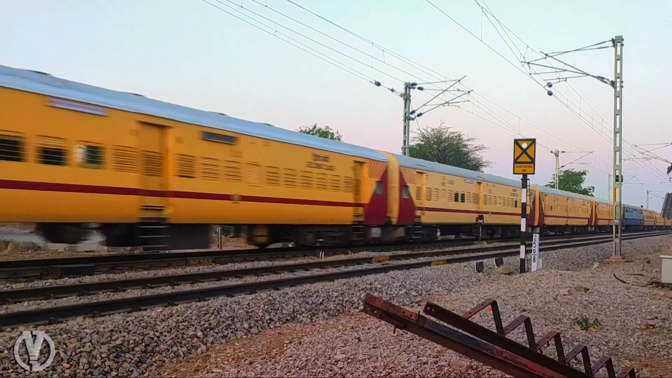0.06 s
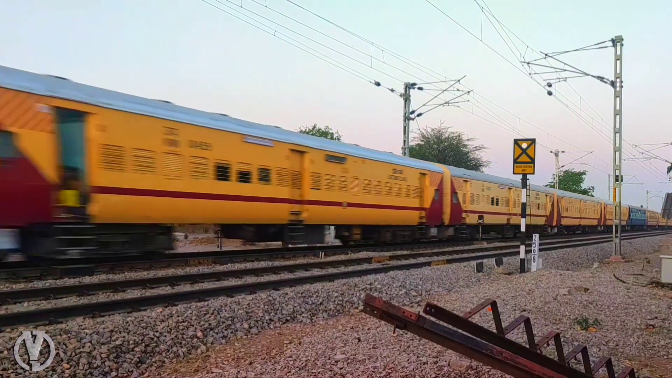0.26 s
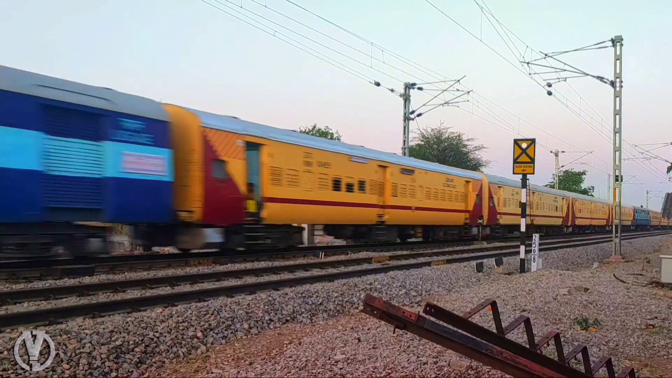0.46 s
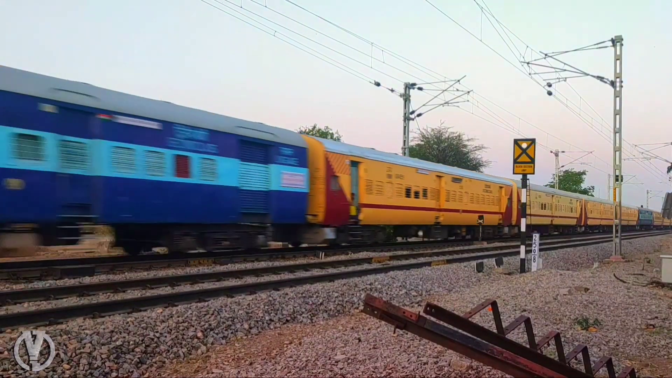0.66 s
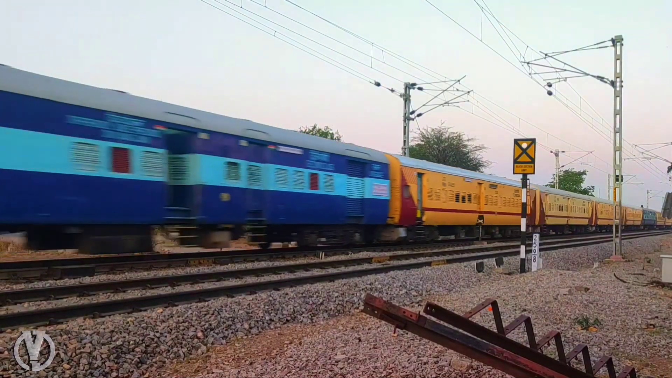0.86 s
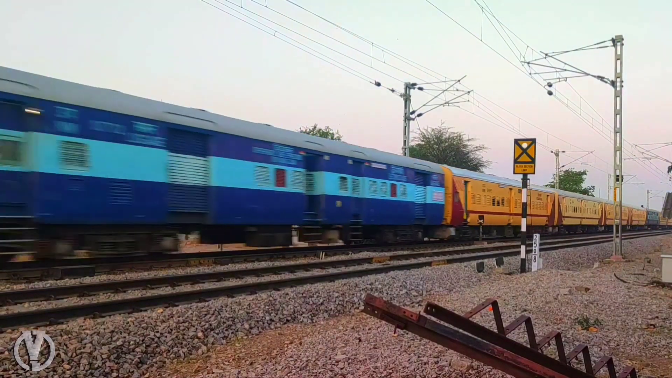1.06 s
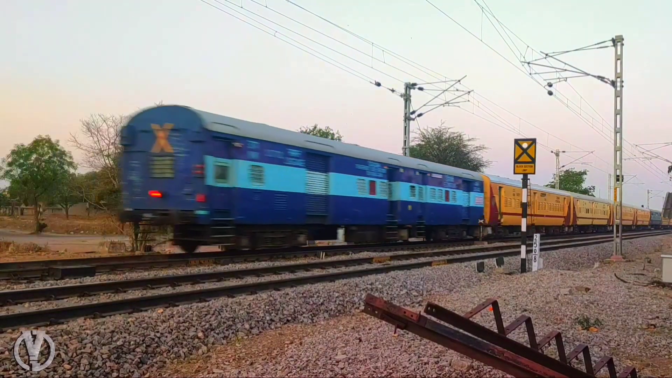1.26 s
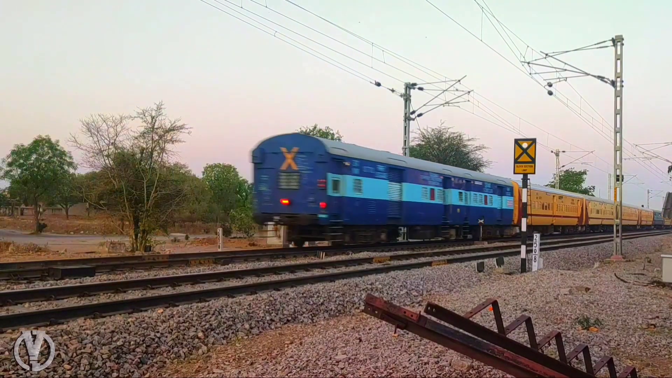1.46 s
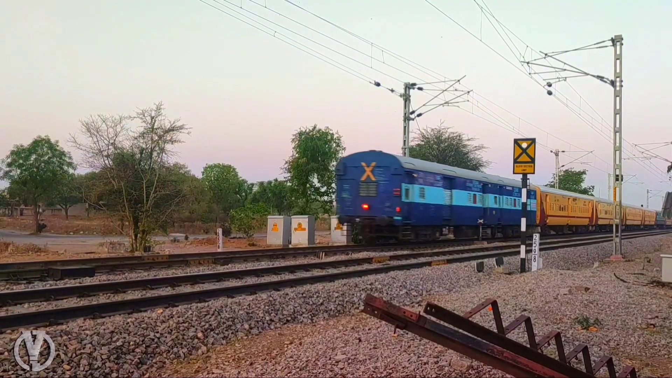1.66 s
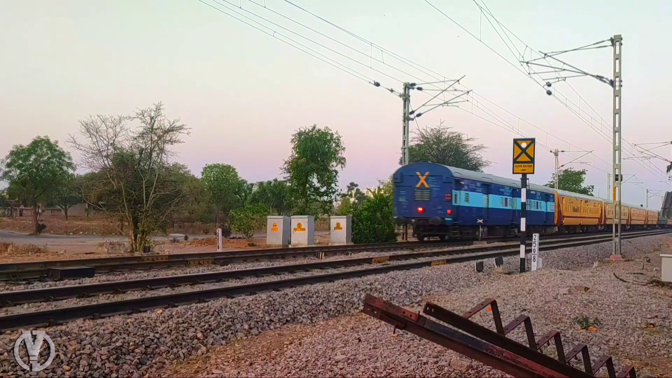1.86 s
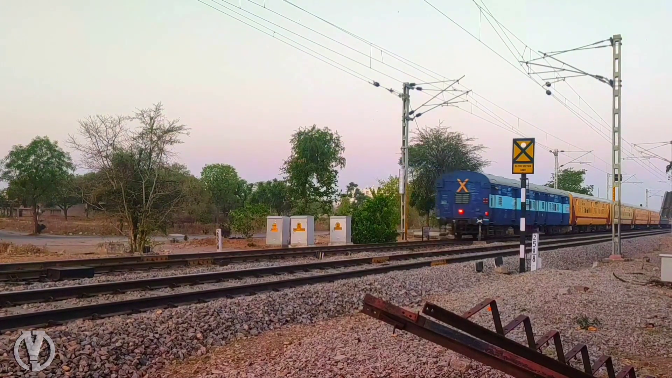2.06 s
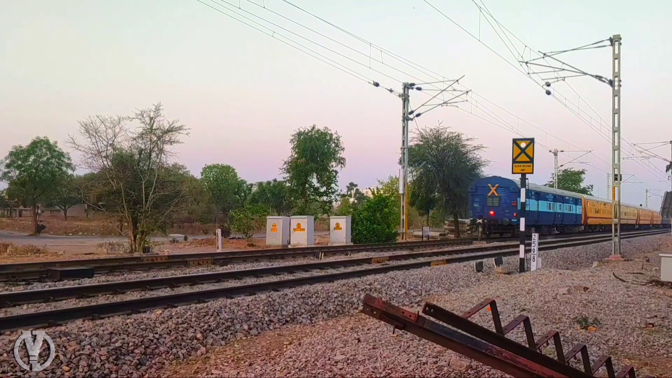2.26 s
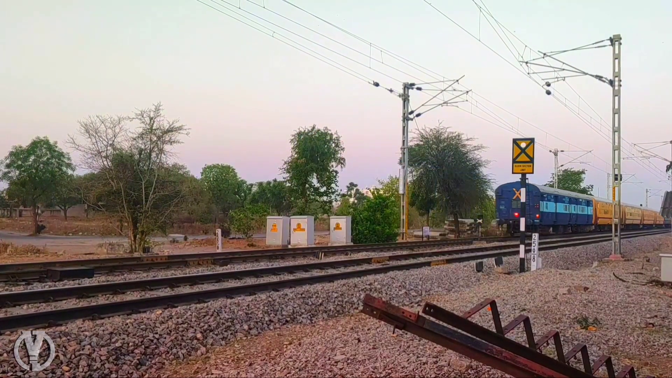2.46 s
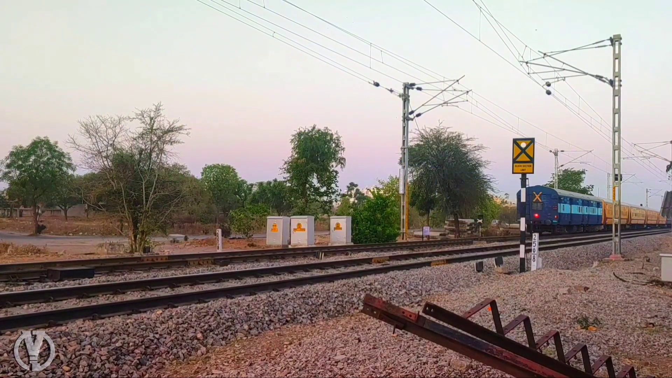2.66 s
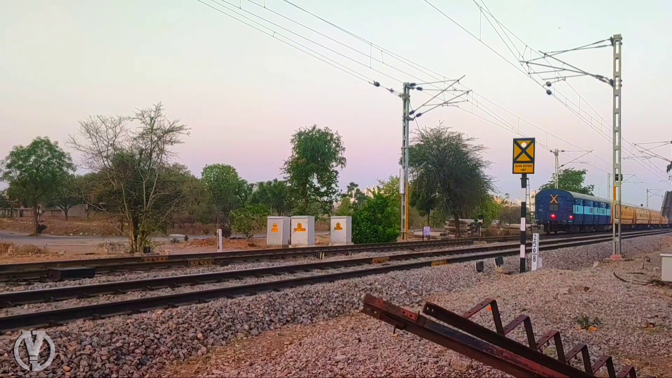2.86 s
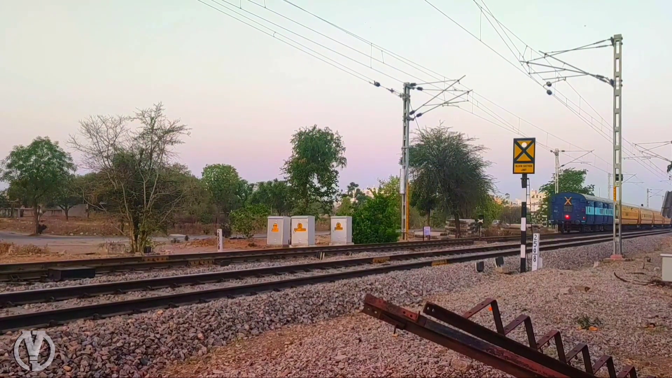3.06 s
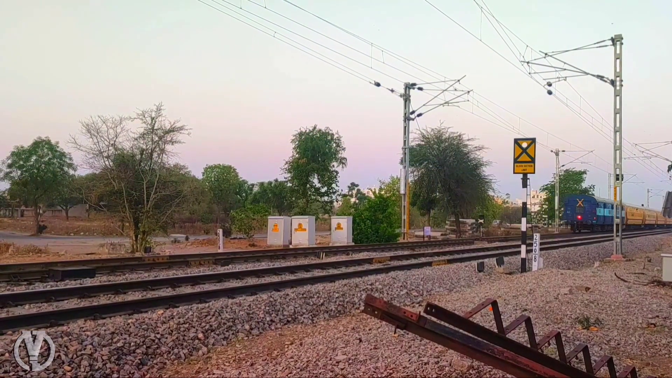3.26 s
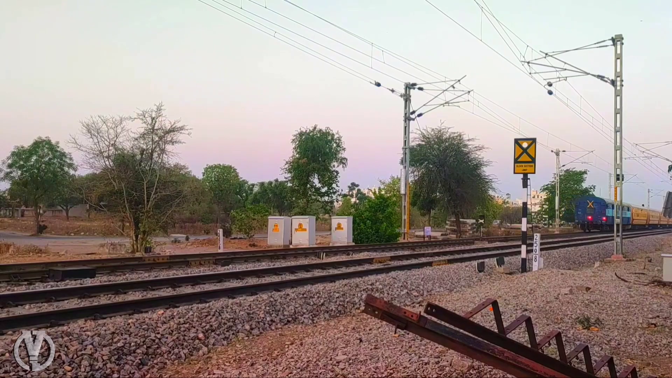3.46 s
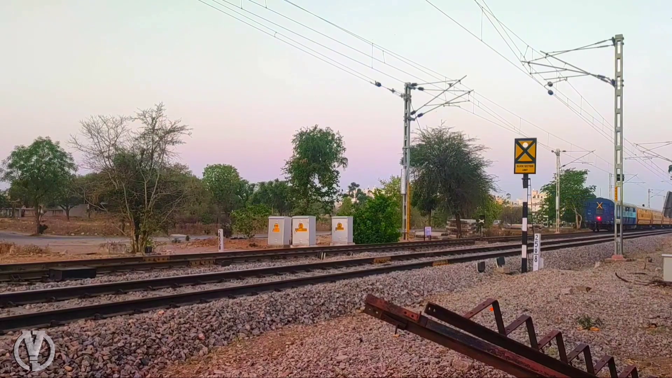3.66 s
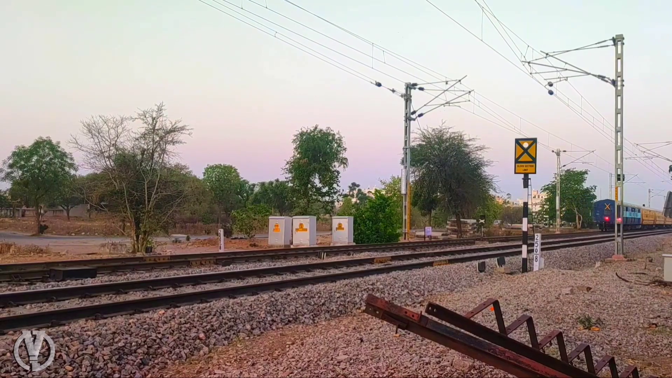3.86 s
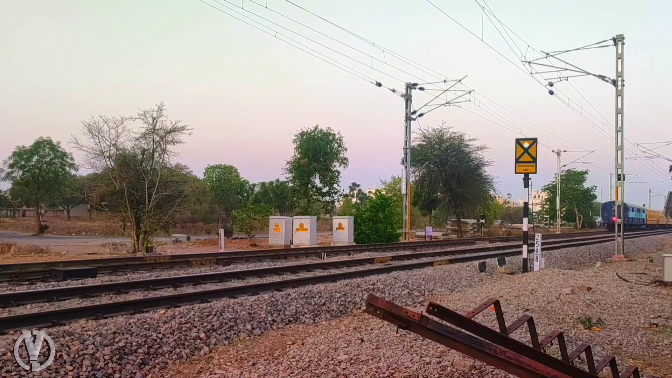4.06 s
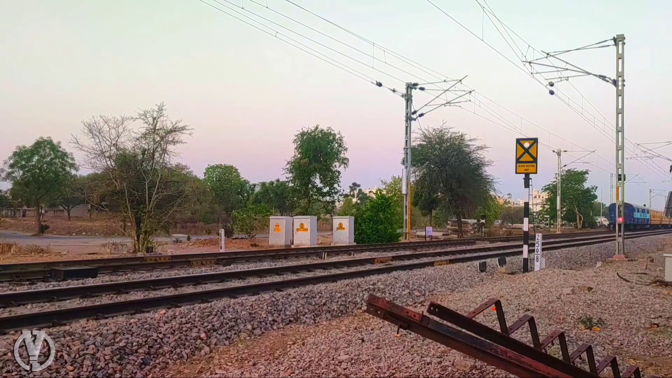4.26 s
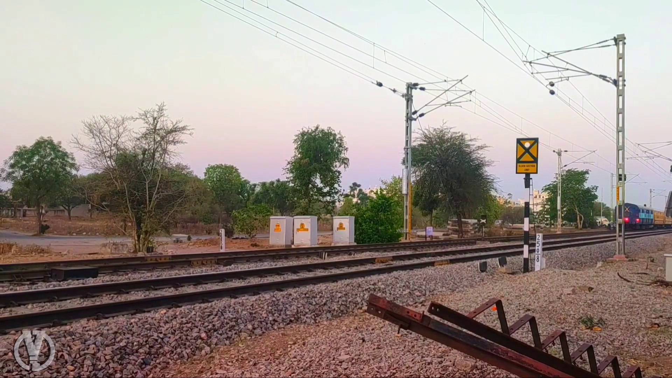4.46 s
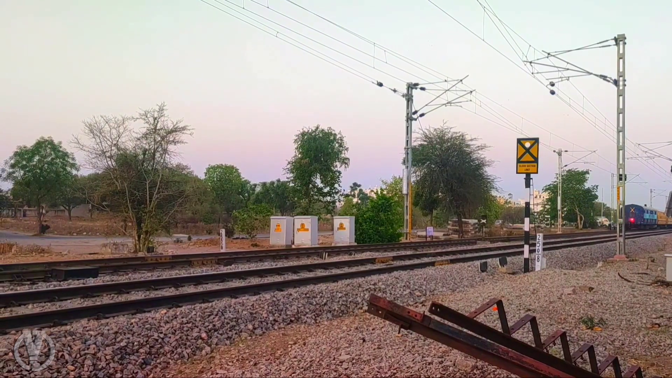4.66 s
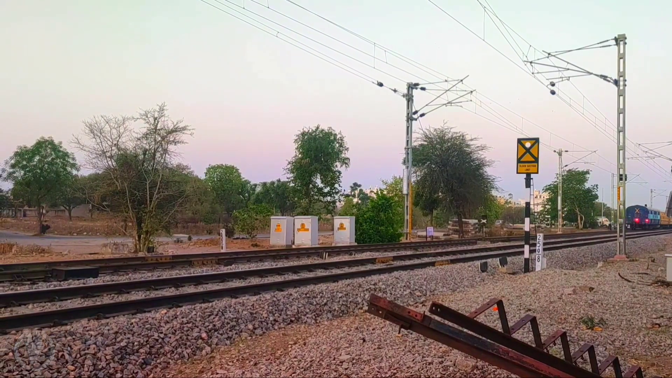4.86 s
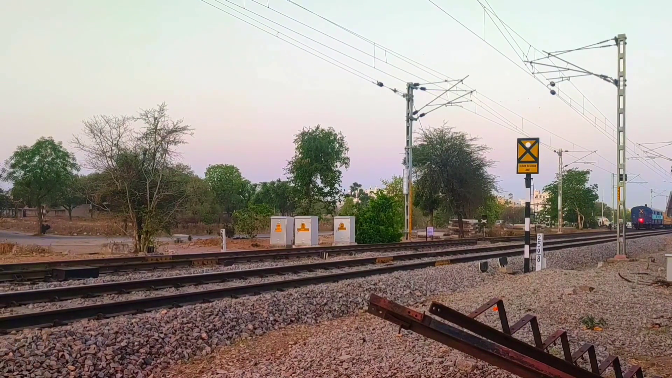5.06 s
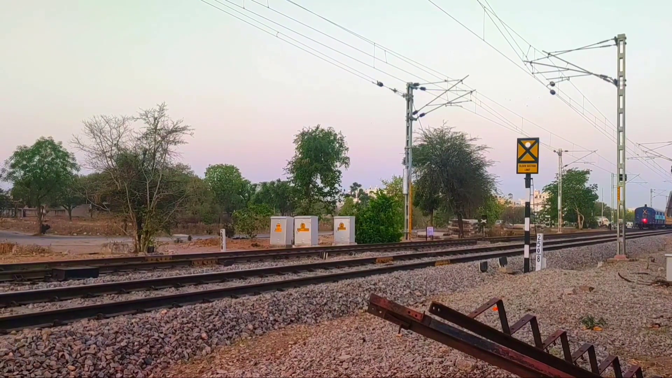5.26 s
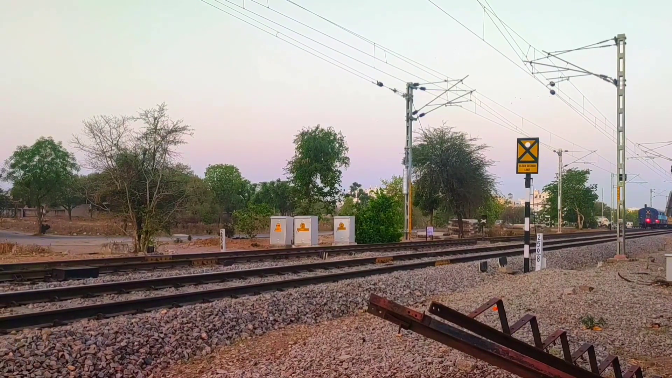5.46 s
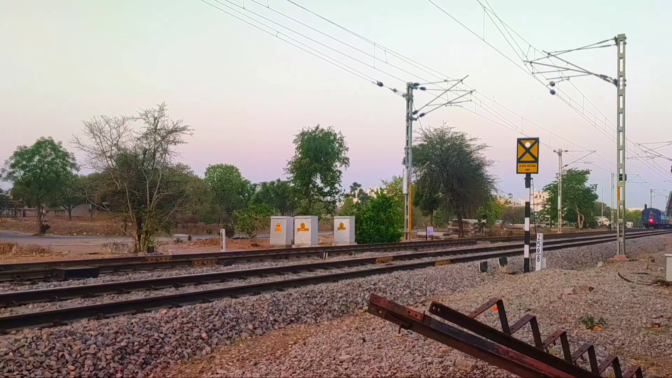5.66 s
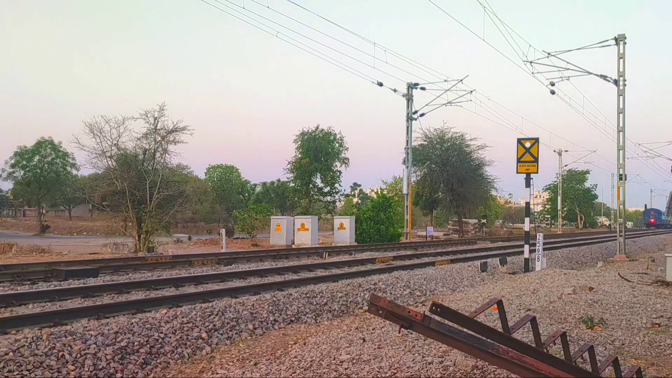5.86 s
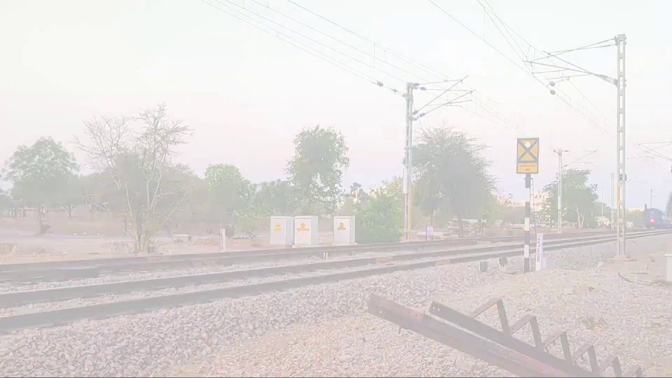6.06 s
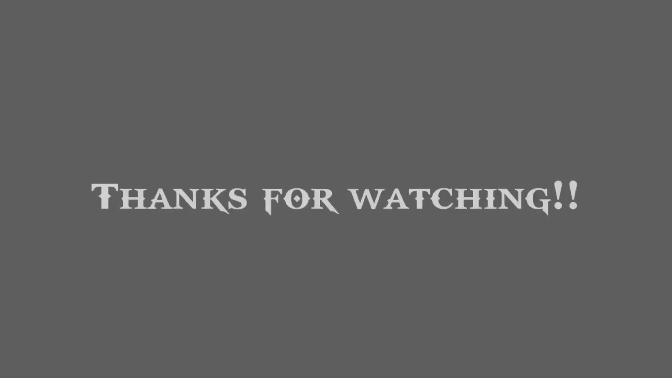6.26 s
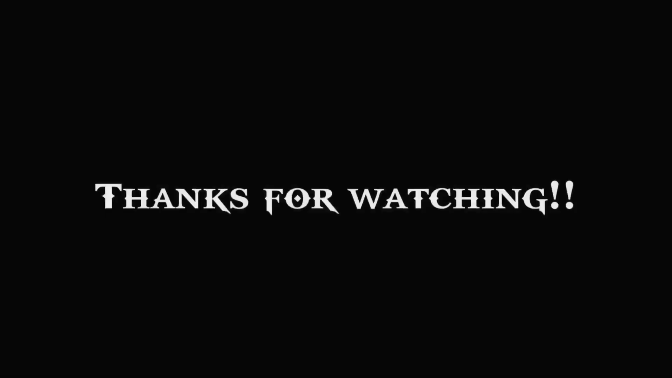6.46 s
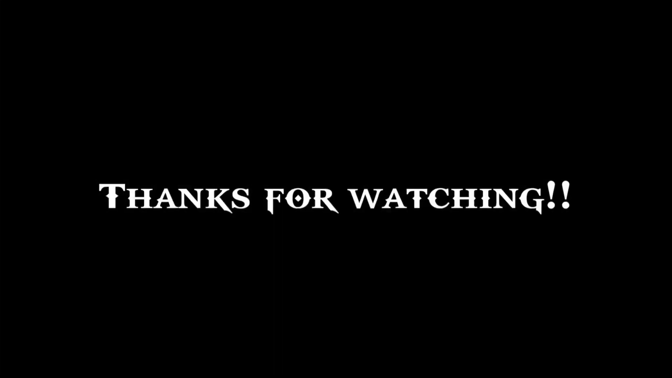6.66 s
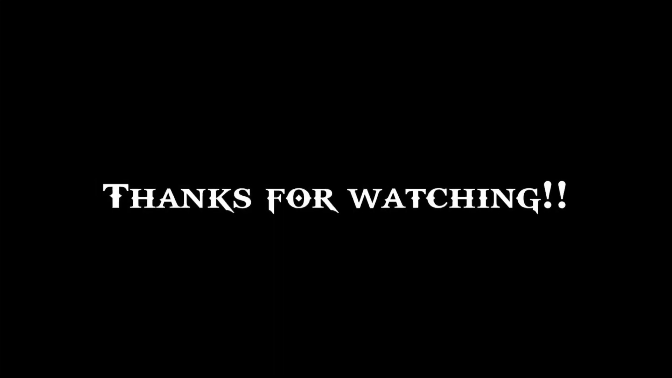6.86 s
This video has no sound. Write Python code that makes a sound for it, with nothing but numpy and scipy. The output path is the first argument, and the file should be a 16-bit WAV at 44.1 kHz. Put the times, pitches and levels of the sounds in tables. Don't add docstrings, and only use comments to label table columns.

```python
import sys
import numpy as np
from scipy import signal
from scipy.fft import rfft, irfft, next_fast_len
from scipy.io import wavfile
from scipy.ndimage import uniform_filter1d, map_coordinates

SR = 44100
rng = np.random.default_rng(int(sys.argv[2]) if len(sys.argv) > 2 else 0)


def nominal_scale(level):
    x = np.asarray(level, float) / 20
    return 10 ** x


def put_to_file(sound):
    columns = np.atleast_2d(sound).T
    safe = np.clip(columns, -1, 1)
    whole_steps = np.round(safe * 32767)
    wavfile.write(sys.argv[1], SR, whole_steps.astype(np.int16))


N = 304277
T = np.arange(N) / SR
SIZE = next_fast_len(N)
HZ = np.maximum(np.fft.rfftfreq(SIZE, 1 / SR), 1)

# low_hz, high_hz
PART_BANDS = [(200, 500), (500, 1300), (1500, 2800), (4000, 10000)]
# time_s, left_port_lag_ms, near_share (0-1)
BEARING = [
    (0, 0.46, 0.91),
    (1.2, .46, 0.69),
    (1.45, 0.31, 0.65),
    (1.75, .08, 0.37),
    (2.5, 0.034, 0.4),
    (2.6, .01, 0.01),
    (6.9, .01, 0),
]
# time_s, level_db
ROLLING_LEVEL = [(0.0, -11), (0.34, -16), (0.74, -15), (0.88, -17.5), (1.03, -17.5), (1.19, -18),
                 (1.36, -20), (1.47, -21), (1.53, -23.5), (1.89, -24), (2.08, -25), (2.38, -23.5),
                 (2.53, -25), (2.7, -28), (3.1, -27.5), (3.95, -28.5), (5.1, -28.5), (6.2, -30)]
# frequency_hz, density_db (per Hz)
NEAR_COLOUR = [(71, -31), (120, 9.5), (184, -9), (299, 5), (413, 1), (476, -2), (632, -3), (987, -5),
               (1230, -13), (2000, -10.5), (2510, -15.5), (2950, -15), (3330, -18), (9730, -23.5),
               (15200, -35.5)]
FAR_COLOUR = [(71, -32.5), (120, -9), (187, -14), (397, -12), (619, -2), (874, -1), (1050, 1), (1210, -3.5),
              (2200, -6.5), (2730, -19.5), (4160, -17.5), (5870, -25.5), (10600, -33), (13500, -50.5),
              (15200, -103)]
# frequency_hz, width_hz, lift_db
NEAR_MODES = [(300, 170, 1.5), (427, 19, 4), (594, 60, 3), (2010, 140, 5), (2500, 140, 7.5),
              (3400, 180, 3.5), (3860, 140, 5.5), (14600, 1300, 4)]
FAR_MODES = [(685, 180, 2.4), (1020, 110, 4), (2090, 20, 2.8), (2370, 34, 2.4), (3160, 130, 4),
             (3500, 220, 5), (3830, 220, 4), (4220, 180, 4.4), (5050, 50, 1.8), (5140, 46, 3)]
# frequency_hz, share (0-1 once clipped)
NEAR_ALIKE = [(150, 5), (300, 1), (700, 0.1), (1400, 1), (3000, -0.08), (6000, -1.1), (12000, -0.45)]
FAR_ALIKE = [(120, 1), (300, 0.96), (700, 0.79), (1400, 0.26), (3000, 0.21), (6000, 0.19), (12000, .05)]
# frequency_hz, left_minus_right_db
NEAR_BALANCE = [(60, -1), (110, 0), (200, 2.3), (380, 1), (690, -1.5), (1280, 3), (2350, 4.5), (4340, 0.5),
                (8000, 2), (14800, -2.5)]
FAR_BALANCE = [(60, -2), (110, -0.5), (200, 1), (380, -2), (690, 1), (1280, -4.5), (2350, 2.5), (4340, -2),
               (8000, 5.5), (14800, -15)]
# over_rolling_db, drift_db_per_s
NEAR_PARTS = [
    (-1.5, -2.5),
    (1.5, 1.5),
    (-2, -1.9),
    (-5.5, 0),
]
FAR_PARTS = [
    (-11, 3),
    (-1.05, -.3),
    (0, 0.38),
    (-6, -2),
]
# start_s, length_s, pitch_hz, level_db
TRACK_TONES = [(0.0, 0.051, 1940, -10), (0.058, 0.1, 7120, -10.5), (0.27, 0.05, 1860, -9),
               (0.28, 0.06, 3500, -20), (0.54, 0.037, 2700, -13.5), (0.631, 0.06, 2570, -19.5),
               (0.679, 0.061, 2525, -7.5), (0.692, 0.084, 1706, -15), (0.9, 0.04, 2500, -19.5),
               (1.073, 0.11, 2430, -16.5), (1.11, 0.07, 3230, -24), (1.18, 0.044, 3860, -25.5),
               (1.21, 0.11, 2563, -17), (1.323, 0.054, 2400, -19), (1.341, 0.18, 4650, -23.5),
               (1.346, 0.091, 8370, -22), (1.39, 0.045, 6380, -22.5), (1.447, 0.053, 1966, -16),
               (1.65, 0.04, 1550, -16), (1.65, 0.06, 3830, -24.5), (1.67, 0.03, 2090, -17),
               (1.827, 0.059, 2050, -17.5), (1.882, 0.05, 7240, -20.5), (2.152, 0.1, 3790, -28.5),
               (2.479, 0.031, 2070, -17.5), (2.672, 0.05, 2380, -26), (2.999, 0.038, 2080, -17.5),
               (3.039, 0.21, 4190, -26), (5.27, 0.22, 3855, -32.5), (5.86, 0.069, 2090, -25),
               (.07, 0.063, 7900, -16), (.88, 0.49, 2455, -25), (0.983, 0.31, 2525, -23.5),
             (1.1, 0.15, 2020, -19), (1.08, .1, 671, -16.5), (2.9, 0.17, 1550, -25),
             (1.24, 0.31, 2500, -24), (.42, .2, 2560, -19), (2.215, 0.12, 1045, -19.5),
             (2.937, 0.042, 965, -18.5), (3.0, 0.41, 1040, -24.5), (2.7, .2, 1030, -28),
             (3.4, 0.17, 1077, -35), (3.94, .07, 1081, -25), (4.98, 0.46, 192, -30),
             (5.365, 0.093, 1022, -27), (5.379, 0.303, 600, -30.5), (5.543, 0.23, 331.5, -30.5),
               (.26, .12, 3400, -21), (.3, .1, 2900, -22), (.69, .06, 1680, -17), (1.0, 0.22, 1050, -22),
                  (.47, .08, 1900, -16), (.63, 0.069, 2000, -15), (.72, .12, 1980, -15),
                  (0.84, .08, 2420, -19), (.88, .1, 1950, -19.5), (.52, .07, 3800, -21.5),
                  (1.28, 0.086, 2480, -20), (4.4, .3, 4700, -36), (4.47, .1, 3500, -33),
                  (5.0, .25, 4800, -38), (5.22, .18, 3200, -36), (5.5, 0.18, 3750, -40),
                  (5.7, .22, 4100, -37), (5.72, .14, 3500, -37), (5.74, .14, 2550, -32),
                  (3.7, .4, 3850, -32), (2.95, 0.37, 1000, -29), (5.38, .5, 195, -35.5),
                  (2.95, .12, 1750, -25.5)]
# time_s, level_db
WAKE_LEVEL = [
    (0, -17.5),
    (.8, -18.5),
    (1.2, -22.5),
    (2.5, -20.5),
    (2.85, -22.5),
    (4.55, -20.5),
    (5.3, -20),
    (5.75, -22.5),
]
# time_s, change_db
BUFFET_SWINGS = [(0.0, 8), (.15, -10), (.23, 8), (.89, 3), (.99, -9), (1.06, 3), (1.33, 2), (1.39, -15.5),
                 (1.44, 3), (1.5, -7.5), (1.56, 4), (1.94, 6.5), (1.99, -7), (2.06, 5), (2.1, -11), (2.15, 3),
                 (2.29, -8), (2.4, -3), (2.46, 7), (5.11, 2.5), (5.17, -20), (5.25, 3.5)]
# frequency_hz, density_db (per Hz)
BUFFET_COLOUR = [(7.1, -33), (14, -4), (30, -6.5), (44, -2.5), (60, -4.5), (84, -8), (110, -18.5),
                 (200, -22), (260, -52.5), (440, -120)]
# start_s, peak_db, pitch_hz
BALLAST_THUMPS = [(0.019, -9, 61.6), (0.084, -6, 95.7), (0.255, -11, 72.8), (0.459, -9, 126),
                  (0.564, -8.5, 94.2), (0.617, -15, 75.1), (0.775, -7.5, 72.7), (0.883, -12, 105),
                  (1.219, -20, 61.9), (1.309, -10.5, 114.8), (1.538, -27, 63), (1.929, -20, 62.3),
                  (2.429, -25, 61.9)]
# time_s, thud_db, clank_db, rattle_db, rise_s
JOINTS = [(0.097, -3.5, -25, -16, .016), (0.291, -17.5, -15.5, -14, 0.019),
          (0.351, -11.5, -5.5, -15, 0.016), (0.439, -15.5, -11, -23.5, .05),
          (0.528, -10.5, -16.5, -26, 0.021), (0.629, -8.5, -14, -28, 0.0078),
          (0.642, -16, -12, -27.5, 0.031), (0.689, -22, -7.5, -16.5, .047), (0.788, -5, -5, -15, .035),
          (0.887, -6, -16, -30.5, 0.019), (1.21, -11.5, -5.5, -38, 0.02), (1.314, -6.5, -8.5, -30, 0.015),
          (1.424, -6.5, -11, -22.5, 0.014), (1.45, -17, -23, -19, 0.041), (1.544, -17.5, -11, -22, 0.04),
          (1.657, -34.5, -15.5, -19.5, 0.027), (1.828, -24, -23, -17.5, .025),
          (1.918, -22.5, -11.5, -17.5, 0.031), (2.157, -34.5, -23, -24, 0.015),
          (2.275, -30.5, -28, -21.5, 0.03), (2.349, -19.5, -12.5, -16.5, 0.034),
          (2.404, -23.5, -20, -26, 0.028), (2.45, -22, -15, -16.5, 0.023), (2.67, -24.5, -24, -31, 0.018)]
# pitch_hz, level_db, t60_s
SLEEPER_MODES = [(170, -5.5, 0.16), (282.6, 5, 0.1), (414.5, 5.5, 0.1), (552, -2, .1), (647, 3.5, 0.078)]
# frequency_hz, density_db
CLANK_COLOUR = [(400, -20.5), (700, 4.5), (1050, -0.5), (1400, 0.5), (2100, -1.5), (3500, -16.5), (5000, -42)]
RATTLE_COLOUR = [(2000, -11.5), (3500, 1.5), (7000, -3), (11000, -7.0), (15300, -9.5)]
GRIND_COLOUR = [(120, -26.0), (230, 1.5), (450, 2), (700, -3), (1100, -27)]
# start_s, peak_db, pitch_hz
KNOCKS = [(0.102, -3, 301), (0.285, -7, 347), (0.343, -8, 336), (0.445, -7, 398), (0.63, -2, 630),
          (0.711, -6, 345), (0.795, -4, 307), (0.896, -4, 296), (1.018, -10, 258), (1.097, -10.5, 326),
          (1.216, -7, 347), (1.319, -5, 291), (1.423, -1.5, 406), (1.544, -12, 283)]
# time_s, peak_db, pitch_hz
VORTICES = [(1.57, -19, 45.3), (1.75, -22, 42), (2.17, -17, 42), (2.54, -15, 38), (2.62, -19, 42),
            (3.12, -20, 58), (3.3, -19, 61.7), (3.49, -18, 58), (3.73, -17.5, 50), (3.97, -18, 42),
            (4.1, -20.5, 70), (4.29, -16.5, 62), (4.38, -14, 50), (4.53, -18, 45), (4.72, -24, 54.6),
            (4.861, -18, 55), (4.97, -15, 50), (5.11, -18, 55), (5.31, -16, 72.4), (5.48, -14.5, 22),
            (5.58, -16, 23), (5.85, -14, 45)]
# pitch_hz, level_db
FAR_WHEEL_MODES = [(2090, -35), (2400, -39), (3500, -41), (3830, -41), (4200, -40), (5100, -48)]
# start_s, length_s, start_hz, end_hz, level_db
CHIRPS = [(4.644, .04, 6000, 5600, -38), (4.4, .025, 5550, 5600, -38), (5.41, .04, 6950, 6900, -40),
          (4.793, .025, 5750, 5900, -39), (4.825, 0.022, 4500, 5360, -38), (4.83, .03, 5500, 6100, -30),
          (5.668, .025, 5200, 4680, -32), (5.69, .03, 5870, 5860, -36), (5.96, 0.052, 5930, 5800, -37),
          (5.69, .025, 5200, 5500, -38), (5.69, 0.02, 4900, 5000, -39), (5.715, 0.022, 4300, 3900, -39),
          (5.73, .015, 4500, 5200, -39)]
# frequency_hz, share (0-1)
TREBLE_KEPT = [(11200, 1), (12200, .45), (13500, .3), (15300, .24)]
# start_s, end_s
FADE = (5.785, 6.223)


def curves(rows):
    s, *columns = np.transpose(rows)
    return [np.interp(T, s, column) for column in columns]


def along_hz(rows):
    hz, value = np.transpose(rows)
    return np.interp(np.log(HZ), np.log(hz), value)


def shape(x, gain):
    return irfft(rfft(x, SIZE) * gain, SIZE)[..., :N]


def rms(x):
    return np.sqrt(np.mean(x ** 2))


def walk(rate_hz):
    hold = int(SR / rate_hz)
    steps = np.repeat(rng.standard_normal(N // hold + 1), hold)
    return uniform_filter1d(uniform_filter1d(steps, hold), hold)[:N]


def swell(t, rise_s):
    u = t / np.clip(rise_s, 0.004, 0.05)
    return (u * np.exp(1 - u)) ** 2


def ports(x, lag_ms):
    late = map_coordinates(x, [np.arange(N) - lag_ms * SR / 1000], order=3, mode="nearest")
    return np.array([late, x])


def roughness(colour, modes, alike, balance, lag_ms):
    lift_db = sum(db / (1 + (2 * (HZ - hz) / width) ** 2) for hz, width, db in modes)
    like = np.clip(along_hz(alike), 0, 1)
    left = 0.26
    right_side, left_side = (ports(rng.standard_normal(N), lag_ms) for _ in range(2))
    both_sides = np.sqrt(1 - left) * right_side + np.sqrt(left) * left_side[::-1]
    common = shape(both_sides, np.sqrt(like))
    apart = shape(rng.standard_normal((2, N)), np.sqrt(1 - like))
    tilt_db = along_hz(balance) / 2 * np.array([[1], [-1]])
    return shape(common + apart, nominal_scale(along_hz(colour) + lift_db + tilt_db))


def rolling(lag_ms, near):
    centres = np.log(np.sqrt(np.prod(PART_BANDS, axis=1)))
    since_gone = np.clip(T - 2.92, 0, 2.76)
    near_nature = (NEAR_COLOUR, NEAR_MODES, NEAR_ALIKE, NEAR_BALANCE)
    far_nature = (FAR_COLOUR, FAR_MODES, FAR_ALIKE, FAR_BALANCE)
    layers = []
    for nature, weight, parts, since in ((near_nature, near, NEAR_PARTS, T),
                                         (far_nature, 1 - near, FAR_PARTS, since_gone)):
        sound = rfft(roughness(*nature, lag_ms), SIZE)
        power = np.abs(sound.mean(axis=0)) ** 2
        band_power = [power[(HZ > lo) & (HZ < hi)].sum() for lo, hi in PART_BANDS]
        own_db = 10 * np.log10(2 * np.array(band_power) / SIZE / N)
        over_db, drift_db = np.transpose(parts)
        layers.append((sound, over_db - own_db, drift_db, since, np.sqrt(weight)))

    level_db = curves(ROLLING_LEVEL)[0]
    shared = walk(11)
    out = 0
    for hz in 125 * 2 ** (np.arange(15) / 2):
        window = np.clip(1 - 2 * np.abs(np.log2(HZ / hz)), 0, 1)
        place = np.interp(np.log(hz), centres, np.arange(len(centres)))
        mix = np.clip(1 - np.abs(place - np.arange(len(centres))), 0, 1)
        band = 0
        for sound, over_db, drift_db, since, weight in layers:
            gain = weight * nominal_scale(mix @ over_db + mix @ drift_db * since)
            band = band + irfft(sound * window, SIZE)[:, :N] * gain
        flicker_db = (0.5 + near) * (0.6 * shared + 1.2 * walk(14))
        out = out + band * nominal_scale(level_db + flicker_db)
    return out


def rings(notes, unrest=0.013, neighbour=0.6):
    out = np.zeros((2, N))
    waver_db = np.array([[3.8, 2.2], [2.2, 3.8]]) @ [walk(130), walk(130)]
    drift = unrest * walk(90)
    for s, length, hz, end_hz, db in notes:
        at = slice(int(max(s, 0) * SR), int((s + length) * SR))
        u = np.linspace(0, 1, at.stop - at.start)
        pitch = (hz + (end_hz - hz) * u) * (1 + drift[at])
        phase = 2 * np.pi * np.cumsum(pitch) / SR
        beside = 2 * np.pi * np.cumsum(hz * (1.03 + drift[::-1][at])) / SR
        skew = np.array([[0], [min(hz / 1900.0, 1.4)]])
        second = neighbour * (400 < hz < 3000) * np.sin(beside - skew)
        envelope = nominal_scale(db - 4 + waver_db[:, at]) * np.sin(np.pi * u) ** 0.6
        out[:, at] += envelope * (np.sin(phase + skew) + second)
    return out


def wheel_and_rail_tones():
    tones = TRACK_TONES
    return rings([(s, length, hz, hz, db) for s, length, hz, db in tones])


def buffet():
    mid, side = shape(rng.standard_normal((2, N)), nominal_scale(along_hz(BUFFET_COLOUR)))
    swing_s = 0.023
    swing_db = sum(db * np.exp(-((T - s) / swing_s) ** 2) for s, db in BUFFET_SWINGS)
    gust = nominal_scale(curves(WAKE_LEVEL)[0] + swing_db + 0.83 * walk(12)) / rms(mid)
    balance = nominal_scale(np.array([[0.4], [-0.4]]))
    return gust * (mid * balance + nominal_scale(-18.0) * side * np.array([[1], [-1]]))


def ballast(lag_ms):
    out = np.zeros(N)
    t = np.arange(SR // 8) / SR
    for s, db, hz in BALLAST_THUMPS:
        at = int(s * SR)
        wave = np.sin(2 * np.pi * hz * t * (0.98 + 3.7 * t))
        out[at:at + len(t)] += nominal_scale(db - 4.0) * swell(t, 0.016) * wave
    return ports(out, lag_ms)


def joints(lag_ms, near):
    t = np.arange(SR // 5) / SR
    thud, clank_env, rattle_env = np.zeros((3, N))
    chance = rng.uniform(-1.08, 1, (len(JOINTS), len(SLEEPER_MODES), 3))
    for (s, thud_db, clank_db, rattle_db, rise_s), draw in zip(JOINTS, chance):
        at = slice(int(s * SR), int(s * SR) + len(t))
        ring = 0
        for (hz, db, t60), (x, y, z) in zip(SLEEPER_MODES, draw):
            decay = nominal_scale(db + 4.0 * z - 60 * t / t60)
            ring = ring + decay * np.sin(2 * np.pi * hz * (1 + 0.077 * y) * t + np.pi * x)
        thud[at] += nominal_scale(thud_db - 7.0) * ring * (1 - np.exp(-t / 0.0043))
        clank_env[at] += nominal_scale(clank_db - 3.5) * swell(t, 0.6 * rise_s)
        early = slice(at.start - SR // 100, at.stop - SR // 100)
        rattle_env[early] += nominal_scale(rattle_db - 2.0) * swell(t, 1.35 * rise_s)
    clank = shape(rng.standard_normal(N), nominal_scale(along_hz(CLANK_COLOUR)))
    rattle = shape(rng.standard_normal((2, N)), nominal_scale(along_hz(RATTLE_COLOUR)))
    dulled = np.where(near > 0, rattle, shape(rattle, HZ < 12500))
    return ports(thud + clank_env * clank / rms(clank), lag_ms) + rattle_env * dulled / rms(rattle)


def stones(lag_ms):
    load, length_s = 0, 0.052
    for s, thud_db, *_ in JOINTS:
        load = load + nominal_scale(thud_db - 8.5) * np.exp(-(2 * (T - s) / length_s - 1) ** 4)
    grind = shape(rng.standard_normal(N), nominal_scale(along_hz(GRIND_COLOUR)))
    return ports(load * grind / rms(grind), lag_ms)


def knocks(lag_ms):
    out = np.zeros(N)
    t = np.arange(SR // 10) / SR
    for s, db, hz in KNOCKS:
        wave = 0
        for ratio, strength in ((1, 1), (0.63, 0.48), (1.45, 0.43), (1.8, 0.3)):
            wave = wave + strength * np.sin(2 * np.pi * ratio * hz * t)
        at = int(s * SR)
        out[at:at + len(t)] += nominal_scale(db - 4.5) * swell(t, 0.007) * wave
    return ports(out, lag_ms)


def vortices():
    out, length_s = 0, 0.045
    for s, db, hz in VORTICES:
        envelope = nominal_scale(db) * np.exp(-((T - s) / length_s) ** 2)
        out = out + envelope * np.sin(2 * np.pi * hz * (T - s))
    return out


def faint_rings():
    start_s, every_s, length_s = 2.6, 0.11, 0.06
    scatter_db, growth_db_per_s = 6, 2
    notes = []
    for k, (when, which, long, slide, size) in enumerate(rng.random((32, 5))):
        hz, db = FAR_WHEEL_MODES[int(which * len(FAR_WHEEL_MODES))]
        since = (k + when) * every_s
        end_hz = hz * (1 + 0.04 * (slide - 0.5))
        level_db = db + scatter_db * (2 * size - 1) + growth_db_per_s * since
        notes.append((start_s + since, length_s * (0.5 + long), hz, end_hz, level_db))
    return rings(notes)


def bird():
    return rings(CHIRPS, unrest=0.008, neighbour=0)


def scene():
    lag_ms, near = curves(BEARING)
    track = rolling(lag_ms, near) + wheel_and_rail_tones() + ballast(lag_ms)
    blows = joints(lag_ms, near) + stones(lag_ms) + knocks(lag_ms)
    air = buffet() + vortices()
    return track + blows + air + faint_rings() + bird()


def sparse_top(x):
    hz, _, cells = signal.stft(x, SR, nperseg=1024)
    share = np.interp(hz, *np.transpose(TREBLE_KEPT))[:, None]
    luck = rng.random((len(hz) // 3 + 1, cells.shape[2] // 3 + 1))
    luck = np.repeat(np.repeat(luck, 3, axis=0), 3, axis=1)[:len(hz), :cells.shape[2]]
    kept = cells * (luck < share) / np.sqrt(share)
    return signal.istft(kept, SR, nperseg=1024)[1][:, :N]


def low_pass(x):
    return signal.sosfilt(signal.butter(12, 15350, fs=SR, output="sos"), x)


def record(dry):
    thinned = sparse_top(dry)
    rounded = thinned / (1 + (thinned / 1.25) ** 4) ** 0.25
    heard = np.clip(rounded, -1, 1)
    fade = np.clip((FADE[1] - T) / (FADE[1] - FADE[0]), 0, 1)
    return low_pass(heard * fade)


dry = scene()
out = record(dry)
put_to_file(out)
```